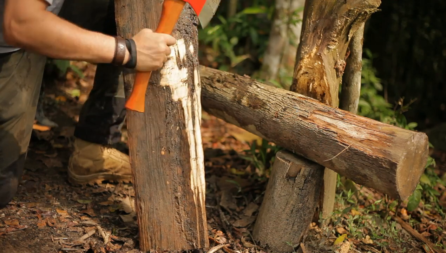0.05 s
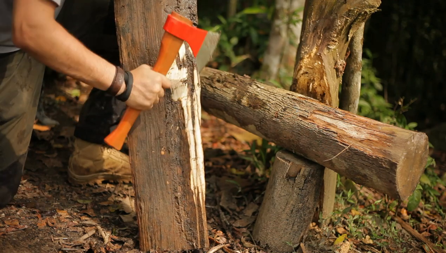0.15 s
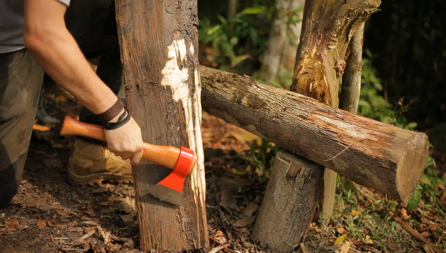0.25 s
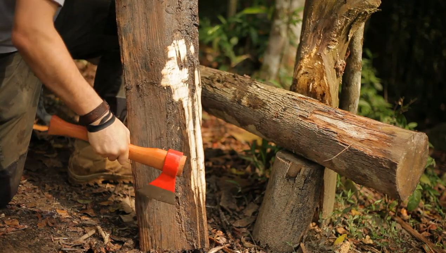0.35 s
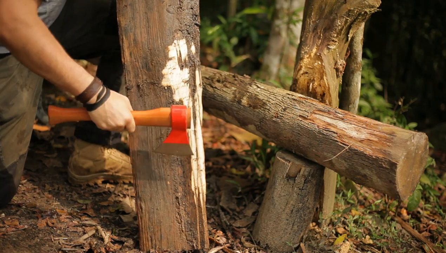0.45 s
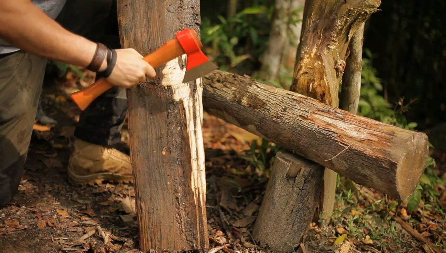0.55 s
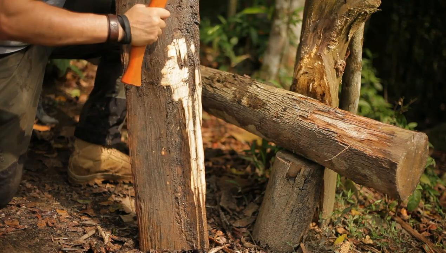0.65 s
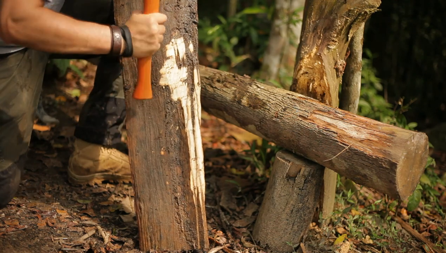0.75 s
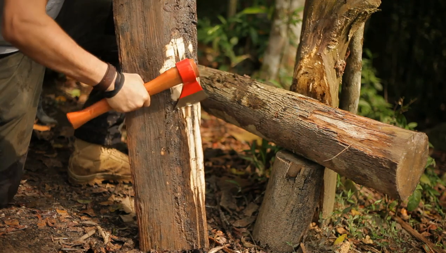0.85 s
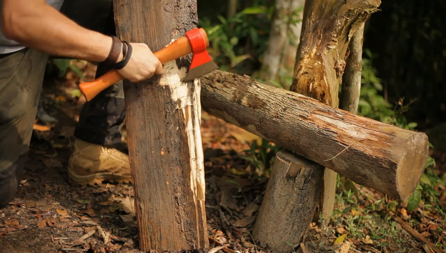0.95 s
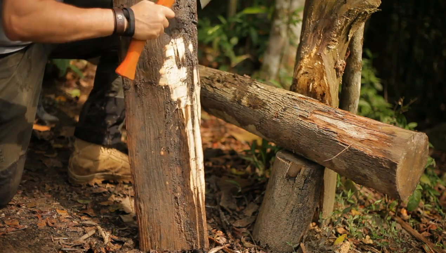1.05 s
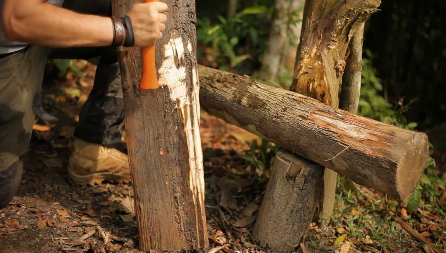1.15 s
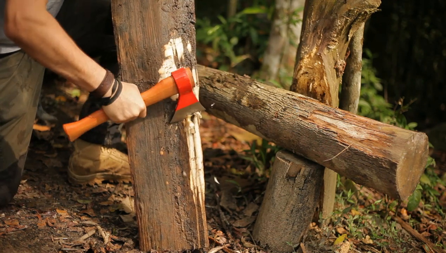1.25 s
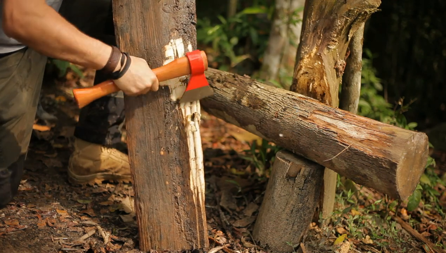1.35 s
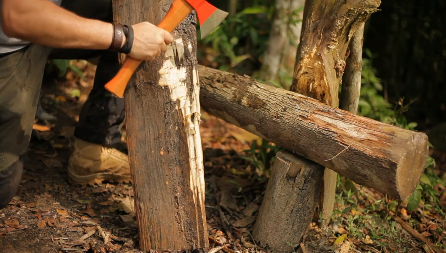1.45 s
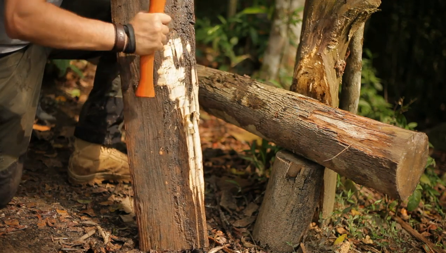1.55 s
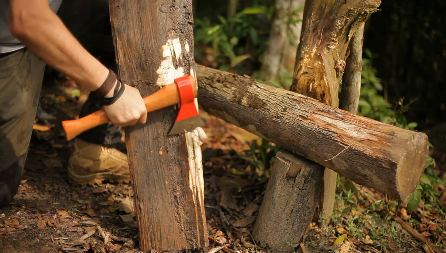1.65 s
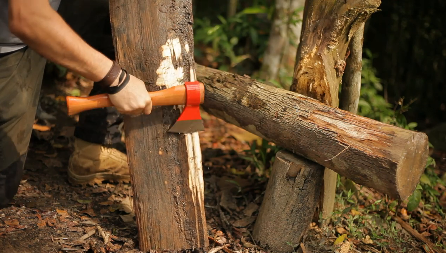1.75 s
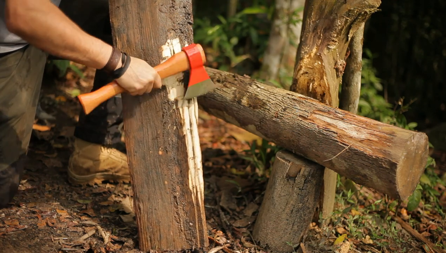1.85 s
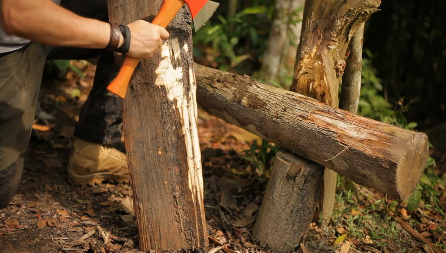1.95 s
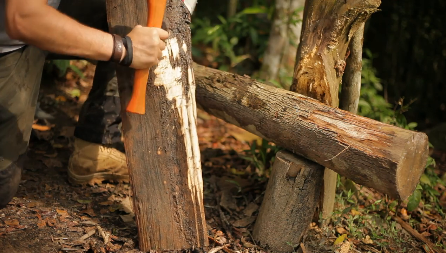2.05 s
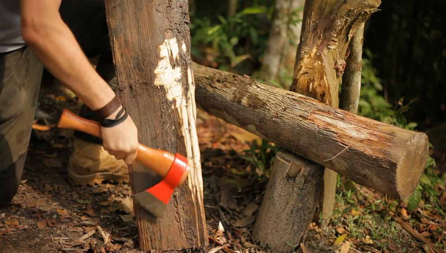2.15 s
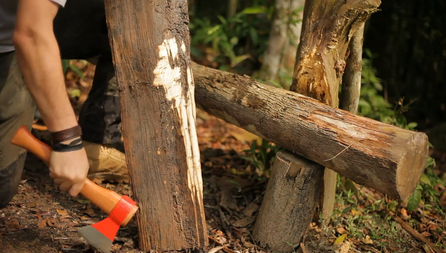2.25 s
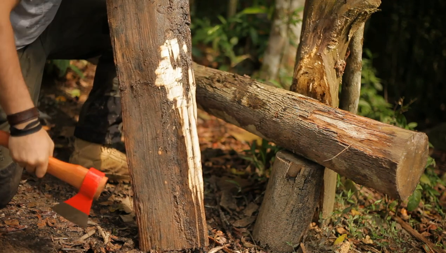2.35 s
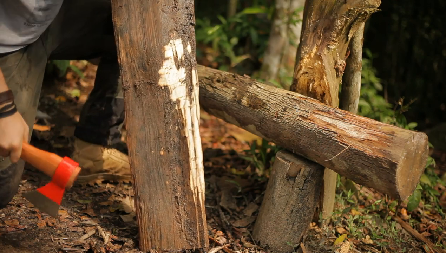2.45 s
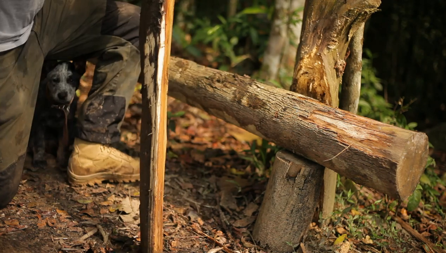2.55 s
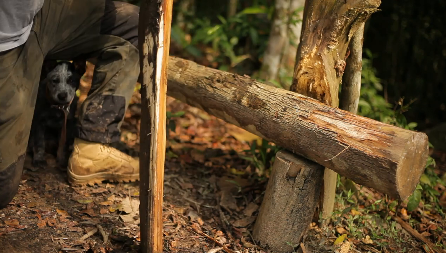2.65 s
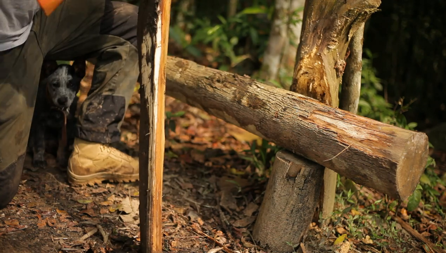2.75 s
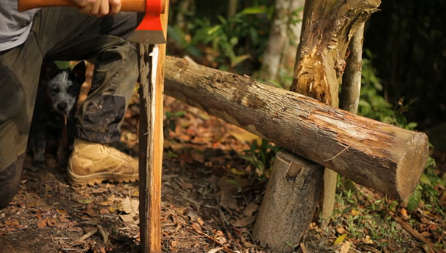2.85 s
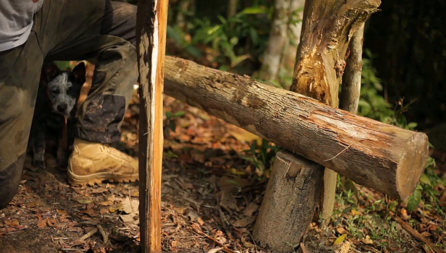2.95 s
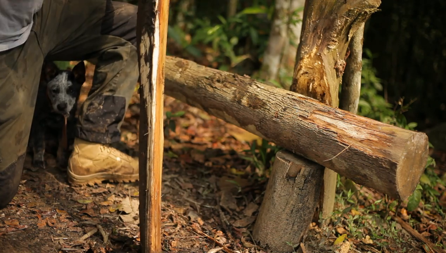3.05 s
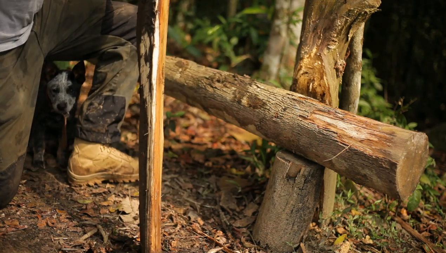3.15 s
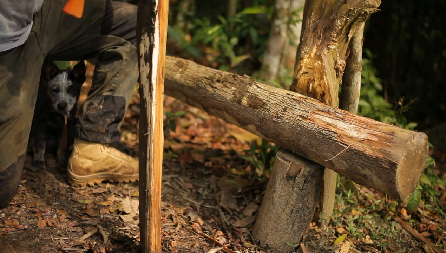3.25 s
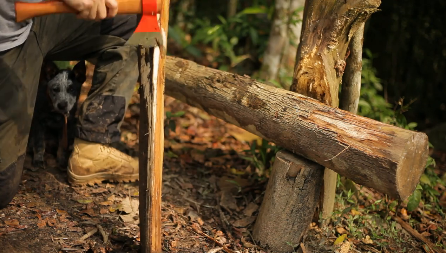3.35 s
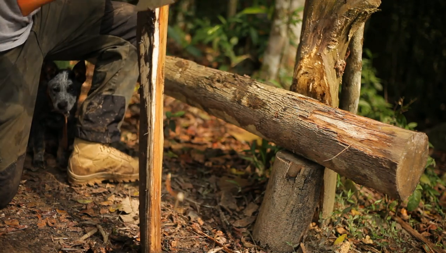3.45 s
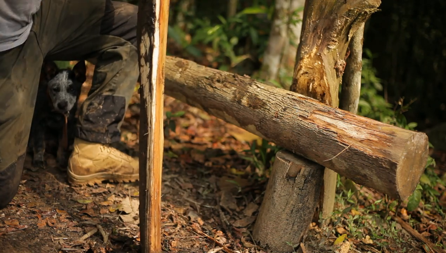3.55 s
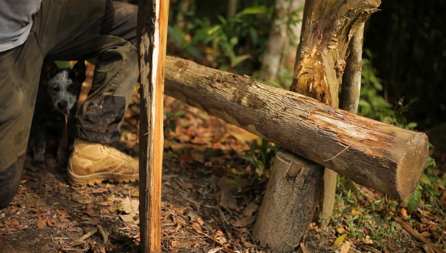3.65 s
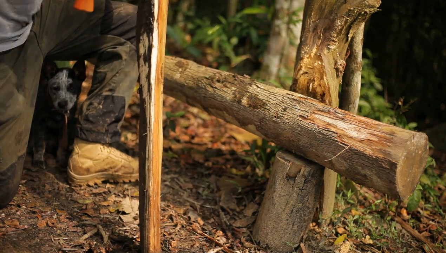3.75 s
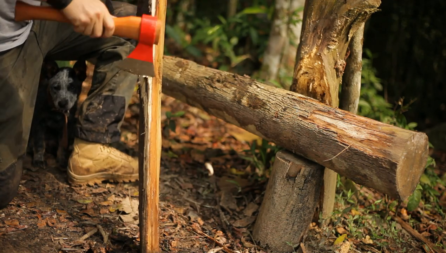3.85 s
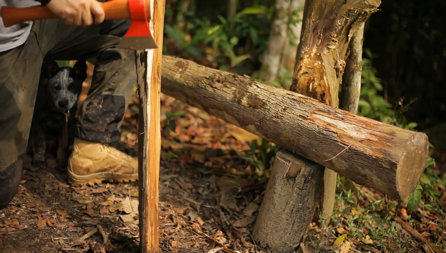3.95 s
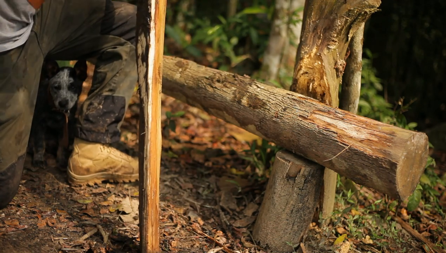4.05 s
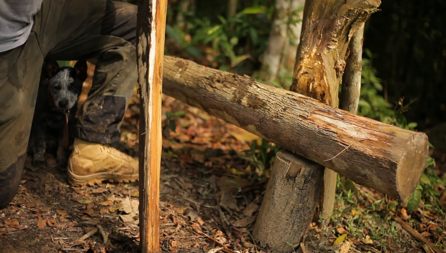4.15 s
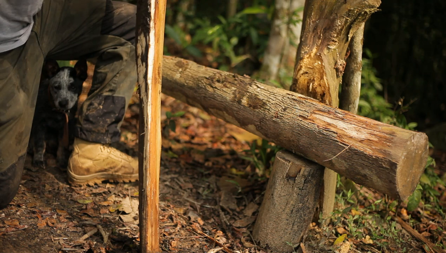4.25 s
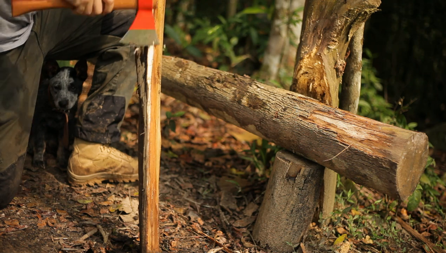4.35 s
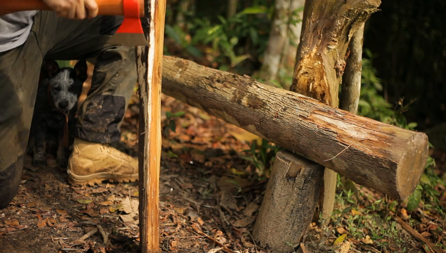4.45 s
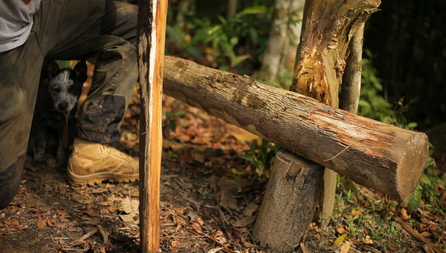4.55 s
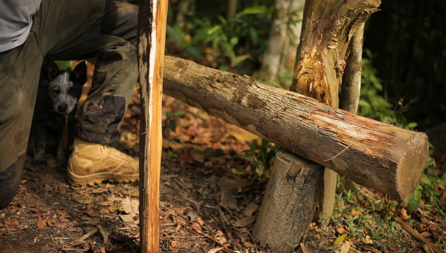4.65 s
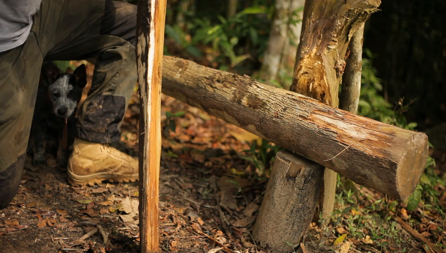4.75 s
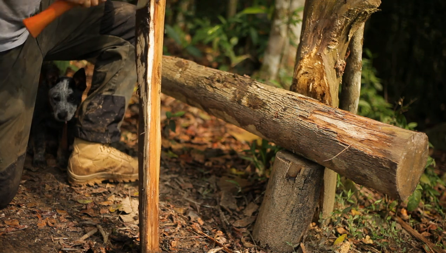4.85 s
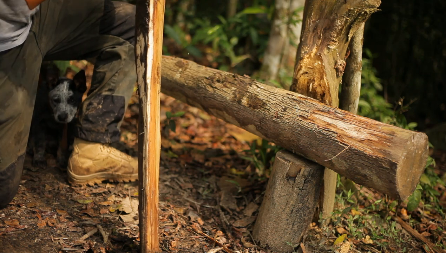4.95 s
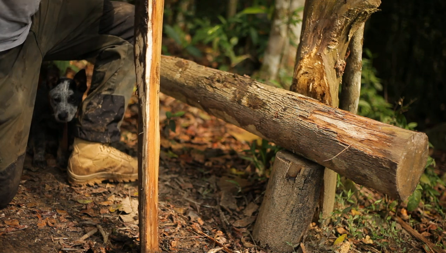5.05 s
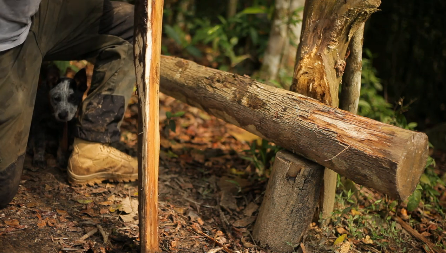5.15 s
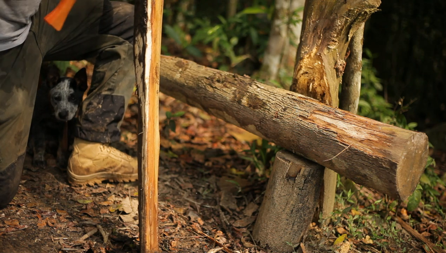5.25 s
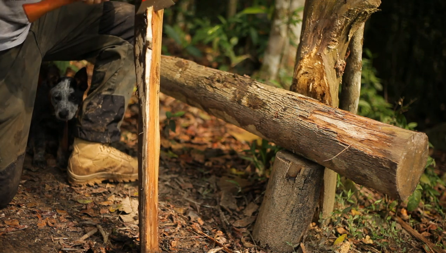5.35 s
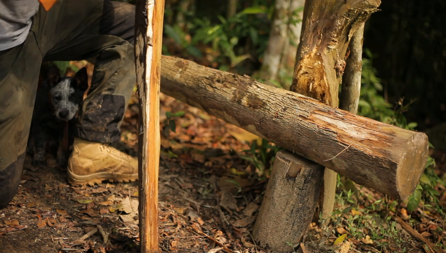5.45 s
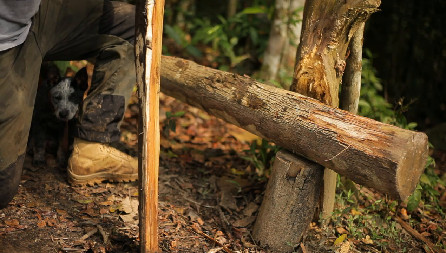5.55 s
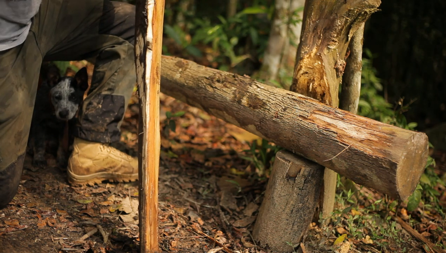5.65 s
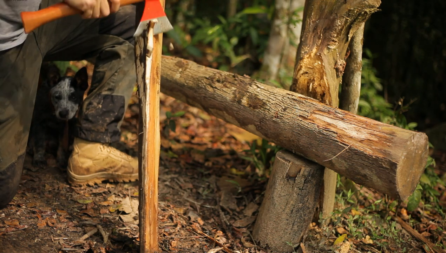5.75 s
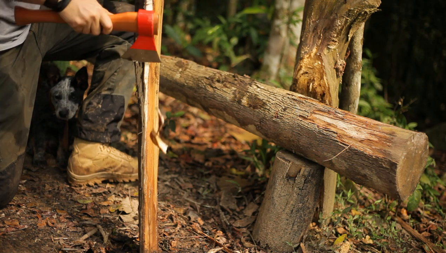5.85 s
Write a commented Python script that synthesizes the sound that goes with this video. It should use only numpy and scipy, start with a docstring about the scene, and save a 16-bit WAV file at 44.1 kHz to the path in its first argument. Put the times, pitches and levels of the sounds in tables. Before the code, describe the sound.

A hatchet chops a standing log with twelve dry, woody blows, turning sharper and crackier midway, over faint forest air and insects.

```python
"""A hatchet hews a standing log in a forest: five blows heard from its broad face, then, after
a sudden jump of the listening position, seven from its edge. Each blow is a burst of noisy snaps coloured
like wood, plus dying tones for the log, the steel head and the peeling slab. Rebounds and chips are softer bursts.
The trees return a faint bright echo; insects shrill near 5 kHz as narrow noise bands and short whistles,
far birds call in sliding tones, quick trills pulse, and shaped noise makes the forest air."""
import sys
import numpy as np
from scipy import signal
from scipy.fft import rfft, irfft
from scipy.io import wavfile
from scipy.ndimage import uniform_filter1d

SR = 44100
rng = np.random.default_rng(int(sys.argv[2]) if len(sys.argv) > 2 else 0)


def wrap_up_sound(samples):
    """Save the sound to the file named by the first command line argument, as 16-bit audio."""
    columns = np.atleast_2d(samples).T
    # keep every value between -1 and 1, then stretch to whole-number steps
    tamed = np.clip(columns, -1, 1)
    steps = np.round(tamed * 32767).astype(np.int16)
    wavfile.write(sys.argv[1], SR, steps)


N = 260631  # length of the whole sound, in samples
SIDE_FROM_S = 2.622  # the listening position jumps from the front (face) to the side (edge)
SIZE = 8192  # length of one hit, in samples

# The hatchet blows. Columns: start_s, bite_s, force_db, thud_db, crack_db, splinter_db, blade_ring_db,
# spot_pitch_hz (the struck spot), slab_pitch_hz (the peeling slab)
BLOWS = [(0.2136, .0041, -19.5, -37.5, -20.5, -29.5, -33, 1034, 1870),
         (0.8331, 0.0082, -17.5, -26.5, -25, -27.5, -41, 1139, 1513),
         (1.2393, .0081, -15.5, -31.5, -20, -27.5, -29, 696, 3010),
         (1.6531, 0.0079, -15, -31.5, -24, -31, -35.5, 777, 2142),
         (2.135, 0.0051, -17.5, -33, -26.5, -32.5, -40, 994, 1894),
         (2.7743, 0.012, -23, -39.5, -17, -21.5, -18, 1557, 2050),
         (3.3077, 0.0044, -18.5, -32, -15, -20.5, -21, 958, 1961),
         (3.8161, 0.0032, -17, -40, -16.5, -26.5, -17, 577, 1897),
         (4.343, 0.0066, -18, -42.5, -21, -29.5, -25, 814, 1772),
         (4.8605, 0.0058, -15, -32, -16, -25, -30.5, 779, 2198),
         (5.2982, .0059, -16, -36, -17, -21.5, -38, 581, 2930),
         (5.7583, 0.0031, -19.5, -49, -19.5, -41.5, -21.5, 1868, 2525)]
# ring of the log relative to the force of a blow (dB)
FACE_RING_DB, EDGE_RING_DB = -3.5, -8.5


def blows():
    """Each blow tears wood; its force knocks and rings the log, and the steel head rings with it."""
    out = np.zeros(N)
    for start, bite, force, thud, crack, splinter, blade, _, _ in BLOWS:
        parts = wood(start, thud, force, crack, splinter)
        add(out, start, tear(bite, parts, contact=0.041, rise=0.0002))
        log_db = force + (FACE_RING_DB if start < SIDE_FROM_S else EDGE_RING_DB)
        add(out, start, log_and_blade(start, log_db, blade))
    return out


# Tone colours of the parts of a blow: the low thud and the knock, heard from the face or the edge,
# the crack of breaking fibres, and fine splinters. Columns of each: pitch_hz, relative_level_db
THUD_FACE = [(25, -29), (55, -14.5), (110, -8), (175, 2.5), (240, 0.5), (300, -12), (420, -25),
             (1000, -54.5)]
THUD_EDGE = [(25, -31), (60, -20.5), (140, -19), (210, -12), (310, -7.5), (400, -0.5), (520, -21),
             (1000, -58.5)]
KNOCK_FACE = [(200, -39), (310, -7), (400, -0.5), (550, -10), (730, 3), (880, -5.5), (1100, -4.5),
              (1450, -9.5), (2200, -30.5), (5000, -70)]
KNOCK_EDGE = [(100, -48), (250, -16.5), (350, -7), (580, 2), (720, -6), (980, -1), (1400, -10),
              (2200, -42.5), (5000, -74)]
CRACK = [(500, -43), (1100, -15.5), (1450, 1.5), (2200, 4), (3200, -2.5), (4500, 0), (5500, -31),
         (10000, -56)]
SPLINTER = [(2500, -26), (4500, -2), (5400, 0), (6500, -4), (8000, 3), (10000, -8), (12500, -7),
            (16000, -15)]


def wood(start, thud_db, knock_db, crack_db, splinter_db, brighten=0.91):
    """Colours and levels of one contact: low thud, knock, crack and splinters, as heard from one side."""
    on_face = start < SIDE_FROM_S
    thud = THUD_FACE if on_face else THUD_EDGE
    knock = KNOCK_FACE if on_face else KNOCK_EDGE
    # dB an octave: violent splintering is also brighter
    tilt = brighten * max(splinter_db + 23.5, -12)
    splinter = [(hz, db + tilt * np.log2(hz)) for hz, db in SPLINTER]
    return [(thud, thud_db), (knock, knock_db), (CRACK, crack_db), (splinter, splinter_db)]


def tear(length, parts, contact, rise, grain_db=5.0, after_db=-17, after_t60=0.079):
    """A contact click, a dense run of snapping fibres, and a dying crackle, coloured by the wood."""
    t, hz = np.arange(SIZE) / SR, np.fft.rfftfreq(SIZE, 1 / SR)
    grain = gain_of(grain_db * np.minimum(rng.exponential(1, SIZE), 4))  # a few snaps are much stronger
    snaps = rng.standard_normal(SIZE) * grain
    bite = np.exp(-(t / length) ** 4)  # the blade stops abruptly
    crackle = gain_of(after_db - 60 * t / after_t60)
    force = snaps * (bite + crackle) * (1 - np.exp(-t / rise))
    force /= np.linalg.norm(force)
    force[0] += contact
    spectrum = rfft(force)
    # snaps leave a fine comb, the wood sets the broad colour
    broad = np.sqrt(uniform_filter1d(abs(spectrum) ** 2, size=50))
    power = sum((gain_of(db) * evened(gain_of(read(colour, hz)))) ** 2 for colour, db in parts)
    coloured = irfft(spectrum * causal(np.sqrt(power) / broad))
    return np.sqrt(power.mean()) * as_hit(coloured)


# Ringing tones of the log. Columns: pitch_hz, t60_s (time to fade by 60 dB),
# face_relative_level_db, edge_relative_level_db
LOG = [(183, 0.081, -19.5, -61), (409, 0.06, -1.5, -9.5), (551, 0.055, -13.5, -4), (744.3, 0.075, -9, 4),
       (793.7, 0.044, -3.5, -9), (978, 0.015, -23, -4), (1100, 0.017, -12, -2), (1205, .035, -6, -26),
       (1490, 0.075, -28.5, -10.5), (1897, 0.11, -19, -16.5), (2173, 0.097, -23.5, -4.5)]
# Ringing tones of the steel head. Columns: pitch_hz, t60_s, relative_level_db
BLADE = [(2928, 0.019, -7.5), (3782, 0.045, -6), (4620, 0.015, -11.5), (7030, 0.036, -15.5),
         (7730, 0.0089, -21.5), (11380, 0.11, -42), (13500, .025, -28)]


def log_and_blade(start, log_db, blade_db):
    """The log and the steel head ring after a contact, each as a set of dying tones."""
    hz, t60, face_db, edge_db = np.transpose(LOG)
    log = ring(hz, t60, face_db if start < SIDE_FROM_S else edge_db)
    blade = ring(*np.transpose(BLADE))
    return gain_of(log_db) * log + gain_of(blade_db) * blade


def ring(hz, t60, db, rise=0.0011, scatter_db=2.5, detune=0.0067):
    """Dying tones that build up while the blade bites; each hit lands on a slightly different spot."""
    t = np.arange(SIZE) / SR
    size, shift = rng.standard_normal((2, len(hz), 1))
    sign = (-1) ** np.arange(len(hz))[:, None]  # neighbouring tones start in opposite directions
    swing = sign * np.sin(2 * np.pi * hz[:, None] * (1 + detune * shift) * t)
    fade = gain_of(db[:, None] + scatter_db * size - 60 * t / t60[:, None])
    return as_hit((fade * swing).sum(0) * (1 - np.exp(-t / rise)))


# Ringing tones of a peeling slab. Columns: multiple (of the slab's pitch), t60_s, relative_level_db
SLAB = [(1, 0.039, 4), (2, .023, -1.5)]
# slab ring relative to the crack (dB), struck spot relative to the force (dB), fade of the spot (s)
SLAB_DB, SPOT_DB, SPOT_T60_S = -4, -5.5, 0.026


def slabs():
    """The wood under the blade knocks at its own pitch; the crack frees a slab whose size sets its pitch."""
    out = np.zeros(N)
    multiple, t60, db = np.transpose(SLAB)
    for start, _, force, _, crack, _, _, spot_hz, slab_hz in BLOWS:
        spot = ring(np.array([spot_hz]), np.array([SPOT_T60_S]), np.zeros(1), detune=0.002)
        slab = ring(slab_hz * multiple, t60, db, scatter_db=1.5, detune=0.002)
        add(out, start, gain_of(force + SPOT_DB) * spot + gain_of(crack + SLAB_DB) * slab)
    return out


# The head rebounds or slips on into the cut. Columns: start_s, force_db, thud_db, crack_db
REBOUNDS = [(.235, -30, -53, -59), (0.2475, -26, -34, -58), (1.676, -51, -53.5, -43.5),
            (2.1509, -18, -29.5, -33.5), (2.8078, -32, -30.5, -39), (2.829, -51, -44.5, -43),
            (3.8378, -19.5, -27, -38), (3.8504, -35, -31.5, -32.5), (3.864, -30.5, -37.5, -36),
            (4.357, -25, -61.5, -39), (4.366, -27.5, -27, -32.5), (4.378, -43, -54.5, -43),
            (4.393, -35.5, -36.5, -42), (5.767, -24.5, -81, -18.5), (5.783, -31, -38, -49.5),
            (5.818, -42.5, -49, -51)]
# a rebound is blunt: its length (s); its splinters and blade ring relative to its crack (dB)
REBOUND_BITE_S, REBOUND_SPLINTER_DB, REBOUND_BLADE_DB = 0.0055, -5.5, -13.5
REBOUND_RING_DB = -0.5  # ring of the log relative to the force


def rebounds():
    """Blunt second contacts: the head touches the wood again, with splinters weaker than the crack."""
    out = np.zeros(N)
    for start, force, thud, crack in REBOUNDS:
        parts = wood(start, thud, force, crack, crack + REBOUND_SPLINTER_DB)
        add(out, start, tear(REBOUND_BITE_S, parts, contact=0.041, rise=0.00086))
        add(out, start, log_and_blade(start, force + REBOUND_RING_DB, crack + REBOUND_BLADE_DB))
    return out


# Chips that snap off or land. Columns: start_s, length_s, level_db (of the click),
# brightness_db (more splinter and less knock)
CHIPS = [(0.064, .002, -69.5, 8), (0.1562, .0068, -44, -1.5), (0.279, .0023, -53.5, 0),
         (0.927, .009, -64, -14.5), (0.942, .0044, -60.5, -18.5), (1.093, .0054, -61.5, 0.5),
         (1.792, .0068, -58, 2.5), (3.05, .0026, -53, 2.5), (3.062, .0026, -54.5, 12.5),
         (3.1067, 0.0064, -30.5, -1), (3.19, .0053, -54, 6.5), (3.21, .005, -51, -0.5),
         (3.23, .0025, -57.5, 4), (3.596, .0046, -49, -1), (4.259, .0028, -56.5, 8.5)]
# Tone colour of a snapping chip. Columns: pitch_hz, relative_level_db
CHIP_CLICK = [(500, -33.5), (1100, -13.5), (1500, -9), (2100, -5.5), (2600, 1), (3600, 0), (4500, -6),
              (5600, -21.5), (10000, -41.5)]
# knock and splinters relative to the click, before brightness (dB)
CHIP_KNOCK_DB, CHIP_SPLINTER_DB = -11.5, -3


def chips():
    """Small snaps of knock, click and splinter, too light to ring the log."""
    out = np.zeros(N)
    for start, length, db, bright_db in CHIPS:
        knock_db = db + CHIP_KNOCK_DB - bright_db
        splinter_db = db + CHIP_SPLINTER_DB + bright_db
        parts = [(KNOCK_EDGE, knock_db), (CHIP_CLICK, db), (SPLINTER, splinter_db)]
        sound = tear(length, parts, contact=0.2, rise=0.00059, grain_db=9.0, after_db=-22, after_t60=0.045)
        add(out, start, sound)
    return out


# Loudness of the echo of the trees. Columns: pitch_hz, relative_level_db
ECHO = [(100, -27), (400, -35), (800, -34.5), (2000, -18.5), (5000, -17.5), (8000, -18.5), (15000, -23.5)]
# Fading time of the echo. Columns: pitch_hz, t60_s
ECHO_T60 = [(100, 0.98), (800, 0.6), (2500, 0.14), (5500, 0.33), (9000, 0.28), (15000, 0.21)]


def trees(x, build=0.005):
    """Trunks and leaves scatter a thin echo, strongest in the treble: sparse random taps that fade."""
    taps = rng.standard_normal(SR) * (rng.random(SR) < 4000 / SR)  # about 4000 taps a second
    hz, t, spectrum = signal.stft(taps, SR, nperseg=256)
    fade = gain_of(-60 * t / read(ECHO_T60, hz)[:, None]) * (1 - np.exp(-t / build))
    fade /= np.sqrt(np.mean(fade ** 2, axis=1, keepdims=True))
    shaped = spectrum * fade * gain_of(read(ECHO, hz))[:, None]
    tail = signal.istft(shaped, SR, nperseg=256)[1]
    return signal.fftconvolve(x, tail / np.linalg.norm(taps))[:N]


# Bands of the far insect chorus. Columns: pitch_hz, width_hz, relative_level_db
INSECTS = [(5220, 290, -3.5), (6640, 180, -14.5), (8700, 1200, -12)]
# The nearest insect notes, which stand out. Columns: start_s, pitch_hz, level_db
NEAR_NOTES = [(.41, 4780, -76), (.57, 4630, -74), (1.11, 5210, -66), (1.9, 4790, -72), (2.63, 5220, -54),
              (2.66, 4810, -59.5), (2.682, 5560, -58.5), (2.88, 4670, -64), (3.105, 5140, -49),
              (3.94, 4970, -61), (4.98, 4980, -62), (5.04, 5140, -52)]
INSECTS_FRONT_DB, INSECTS_SIDE_DB = -70, -59.5


def insects(count=130, centre_hz=5150, spread_hz=220, spread_db=3, notes_db=-5, waver_db=1.5):
    """Far insects merge into a few shrill bands; nearer ones overlap as short notes of scattered pitch."""
    chorus, crowd, near = np.zeros((3, N))
    for hz, width, db in INSECTS:
        waver = waver_db * band(0, 9.1, count=N)
        chorus += gain_of(db + waver) * band(hz, width, count=N)
    for k, (pitch, size) in enumerate(rng.standard_normal((count, 2))):
        start = (k + rng.random()) / count * N / SR
        add(crowd, start, note(centre_hz + spread_hz * pitch, spread_db * size))
    for start, hz, db in NEAR_NOTES:
        add(near, start, note(hz, db))
    far = chorus + gain_of(notes_db) * evened(crowd)
    return near + far * background_gain(INSECTS_FRONT_DB, INSECTS_SIDE_DB)


def note(hz, db):
    """One insect note: a thin whistle, 0.13 s long and 38 Hz wide, that rises 50 Hz."""
    return gain_of(db) * glide(0.13, hz - 50, hz, width=38)


# Distant bird calls, the first a low hoot.
# Columns: start_s, length_s, first_pitch_hz, last_pitch_hz, width_hz, level_db
BIRD_CALLS = [(1.375, .052, 446, 480, 5.4, -49), (1.468, 0.077, 780, 820, 110, -68),
              (1.933, .21, 2520, 2560, 540, -76), (2.507, 0.12, 2330, 2560, 700, -69.5),
              (4.957, 0.049, 3710, 3740, 27, -58.5)]


def birds():
    """Far bird calls, each a blurred sliding tone."""
    out = np.zeros(N)
    for start, length, first_hz, last_hz, width, db in BIRD_CALLS:
        add(out, start, gain_of(db) * glide(length, first_hz, last_hz, width))
    return out


def glide(length, first_hz, last_hz, width):
    """A tone that slides onto its last pitch, fading in and out, blurred by distance."""
    count = int(length * SR)
    hz = last_hz + (first_hz - last_hz) * np.linspace(1, 0, count) ** 2
    turn = np.exp(2j * np.pi * np.cumsum(hz) / SR)
    blur = (band(0, width, count=2 * SIZE) + 1j * band(0, width, count=2 * SIZE))[:count]
    return evened((turn * blur).real * signal.windows.tukey(count, 0.45))


# Trills of birds and insects. Columns: start_s, length_s, first_pitch_hz, last_pitch_hz,
# rate_hz (pulses a second), slur (fall of each pulse as a share of its pitch), level_db
TRILLS = [(0.338, 0.26, 5850, 5960, 62, .06, -77), (1.375, .25, 5760, 6100, 62, 0.07, -74.5),
          (2.22, .25, 5700, 6010, 68, .06, -73), (5.055, 0.7, 3010, 3085, 24, .011, -72.5)]


def trills():
    """All the trills, each placed at its start."""
    out = np.zeros(N)
    for start, *shape in TRILLS:
        add(out, start, trill(*shape))
    return out


def trill(length, first_hz, last_hz, rate, slur, db):
    """Rapid chirps; each pulse falls a little in pitch."""
    t = np.arange(int(length * SR)) / SR
    stroke = rate * t % 1  # runs from 0 to 1 within each pulse
    path = last_hz + (first_hz - last_hz) * (1 - t / length) ** 2
    hz = path * (1 + slur * (0.5 - stroke))
    pulses = np.sin(2 * np.pi * np.cumsum(hz) / SR) * np.sin(np.pi * stroke)
    return gain_of(db) * evened(pulses * signal.windows.tukey(len(t), 0.3))


# Tone colour of the forest air at the front and at the side of the log.
# Columns of each: pitch_hz, relative_level_db (per Hz)
AIR_FRONT = [(15, -30.5), (25, -10.5), (50, 3), (90, -4.5), (150, -8), (280, -11.5), (480, -16),
             (800, -15.5), (1650, -22.5), (2500, -23.5), (4000, -28.5), (6400, -31), (10000, -32.5),
             (16000, -41.5)]
AIR_SIDE = [(15, -31), (25, -12.5), (48, 3), (90, -0.5), (230, -4.5), (450, -9), (800, -11.5), (1900, -18),
            (3000, -18), (4200, -22.5), (6000, -24), (8500, -24.5), (11000, -31), (16000, -31.5)]
AIR_FRONT_DB, AIR_SIDE_DB = -67.5, -57


def air():
    """Soft wash of the forest, louder at the side: noise shaped by a different colour in each place."""
    t, hz = np.arange(N) / SR, np.fft.rfftfreq(N, 1 / SR)
    front, side = (evened(irfft(rfft(rng.standard_normal(N)) * gain_of(read(colour, hz)), N))
                   for colour in (AIR_FRONT, AIR_SIDE))
    return np.where(t < SIDE_FROM_S, front, side) * background_gain(AIR_FRONT_DB, AIR_SIDE_DB)


# Rise and fall of the background at the side, shared by air and far insects; only differences count.
# Columns: time_s, relative_level_db
BACKGROUND = [(2.8, -52), (3.26, -53.5), (3.39, -62), (3.62, -55), (3.86, -54), (5.9, -56)]


def background_gain(front_db, side_db):
    """Steady at the front; at the side the level rises and falls around its average."""
    t = np.arange(N) / SR
    swell = np.interp(t, *np.transpose(BACKGROUND))
    swell -= swell[t >= SIDE_FROM_S].mean()
    return gain_of(np.where(t < SIDE_FROM_S, front_db, side_db + swell))


def band(hz, width, count):
    """A narrow, fuzzy tone: noise filtered around one pitch."""
    f = np.fft.rfftfreq(count, 1 / SR)
    gain = 1 / (1 + (2 * (f - hz) / width) ** 4) ** 0.5
    return evened(irfft(rfft(rng.standard_normal(count)) * gain, count))


def causal(gain):
    """Spectrum of the promptest (minimum-phase) filter with this gain."""
    cepstrum = irfft(np.log(np.maximum(gain, gain.max() * 1e-5)))
    cepstrum[1:SIZE // 2] *= 2
    cepstrum[SIZE // 2 + 1:] = 0
    return np.exp(rfft(cepstrum))


def gain_of(db):
    """Decibels to gain."""
    return 10 ** (np.asarray(db) / 20)


def evened(x):
    """Scales to rms 1."""
    return x / np.sqrt(np.mean(x ** 2) + 1e-20)


def as_hit(x):
    """Scales a short sound to the energy of 10 ms at rms 1."""
    return x * np.sqrt(0.01 * SR / (np.sum(x ** 2) + 1e-20))


def read(points, hz):
    """Reads a table on a log-frequency axis."""
    f, value = np.transpose(points)
    return np.interp(np.log(hz + 1), np.log(f + 1), value)


def add(mix, start, sound):
    """Mixes a sound in at its start time (s)."""
    part = mix[round(start * SR):][:len(sound)]
    part += sound[:len(part)]


def scene(echo_db=0.94):
    """The chopping, its echo and the peeling slabs over the sounds of the forest."""
    chopping = blows() + rebounds() + chips()
    echo = gain_of(echo_db) * trees(chopping)
    forest = insects() + birds() + trills() + air()
    return (chopping + slabs() + echo + forest)[None]


def record(dry):
    """Peaks beyond full scale are cut flat; then a low-pass filter ends the treble near 16.1 kHz."""
    clipped = np.clip(dry, -1, 1)
    lowpass = signal.firwin(255, 16100, window=("kaiser", 9), fs=SR)
    return signal.oaconvolve(clipped, lowpass[None], "same")


dry = scene()
out = record(dry)
wrap_up_sound(out)
```